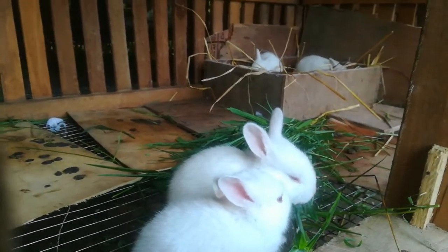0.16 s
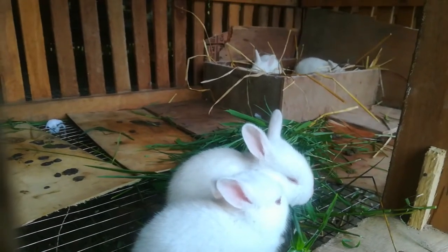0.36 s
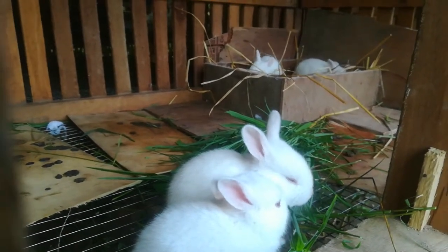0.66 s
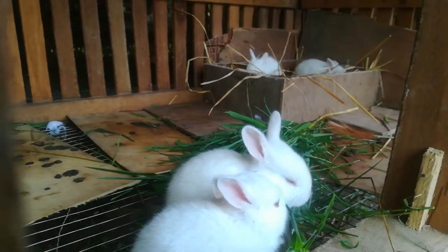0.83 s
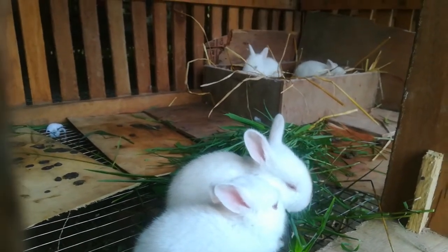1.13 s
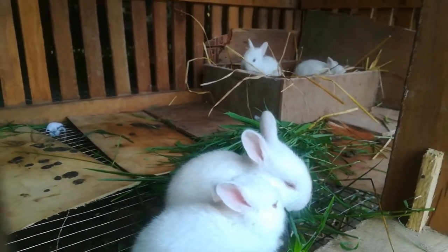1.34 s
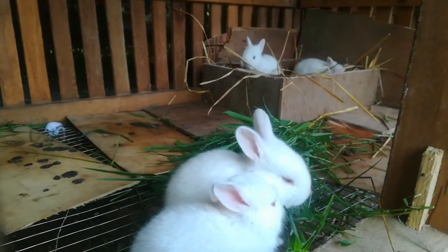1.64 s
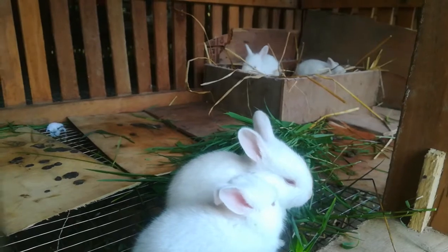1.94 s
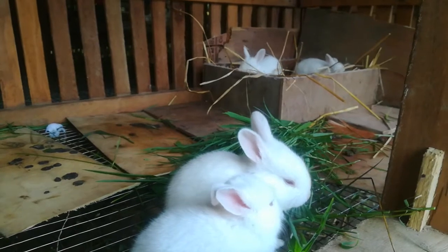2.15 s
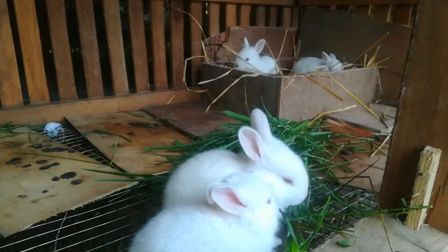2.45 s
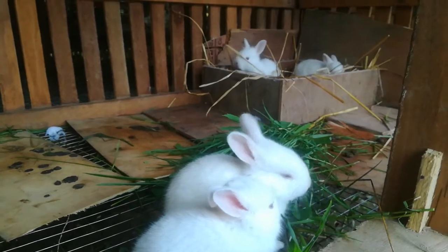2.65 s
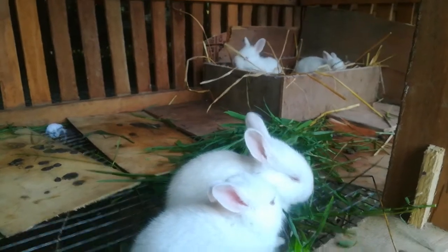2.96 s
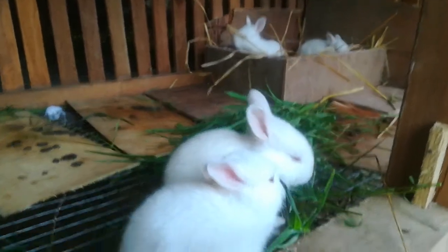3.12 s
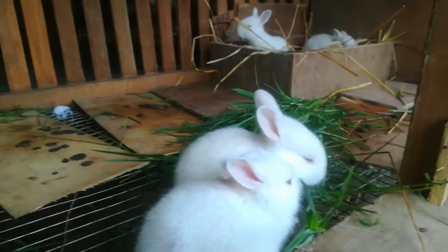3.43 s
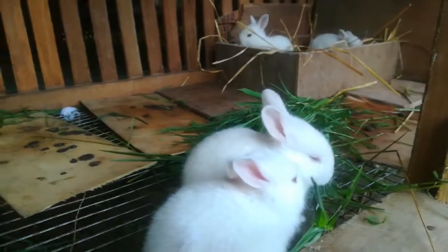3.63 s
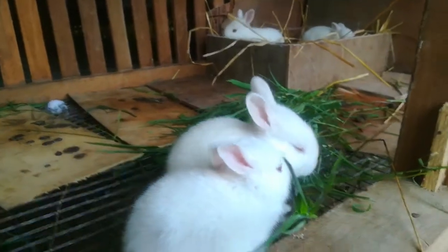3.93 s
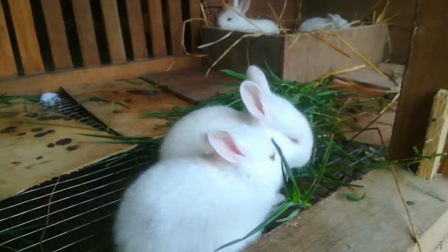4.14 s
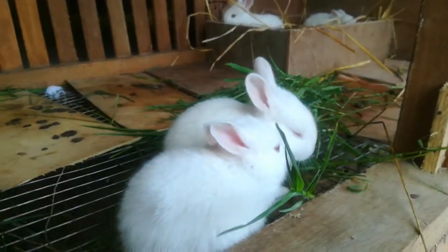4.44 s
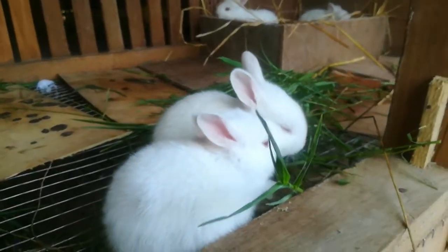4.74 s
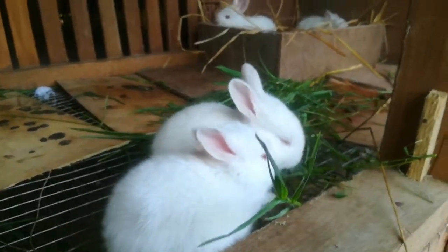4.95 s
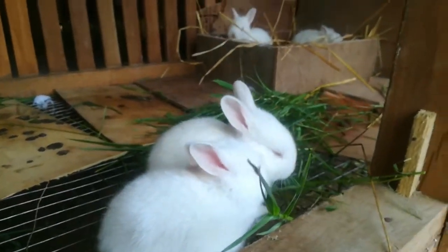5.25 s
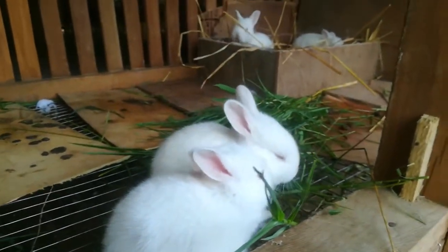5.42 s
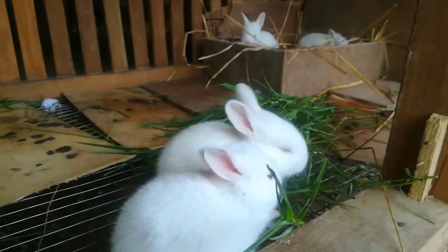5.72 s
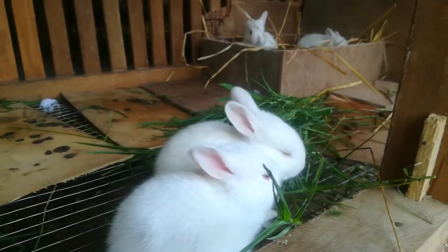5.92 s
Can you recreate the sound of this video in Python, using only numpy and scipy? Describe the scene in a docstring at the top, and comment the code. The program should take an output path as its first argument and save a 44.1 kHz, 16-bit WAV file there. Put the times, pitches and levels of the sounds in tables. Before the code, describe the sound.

Dry grass swishes, small snapping ticks and sudden wooden knocks in a rabbit hutch, over chirping crickets, insect hiss and faint traffic rumble.

```python
"""Rabbits pull at grass in a wooden hutch: dense tiny clicks make the swishes, short ticks the snapping stalks.
Gliding bands of noise scrape and squeak; four knocks ring the boards, shake straw and rattle the wire floor.
On this warm evening a near cricket chirps in threes and a far one calls in single syllables, both made from
clicking teeth on a wing; a chorus of band-limited noise hisses, and noise with a swelling bass is far traffic."""
import sys
import numpy as np
from scipy import signal
from scipy.io import wavfile

SR = 44100
rng = np.random.default_rng(int(sys.argv[2]) if len(sys.argv) > 2 else 0)


def dump_mix(stems):
    """Bounce the given channels to the path in sys.argv[1] as a 16-bit WAV at rate SR."""
    frames = np.atleast_2d(stems).T  # one column per channel
    limited = np.clip(frames, -1, 1)  # hard clip at full scale
    pcm = np.round(limited * 32767).astype(np.int16)
    wavfile.write(sys.argv[1], SR, pcm)


N = 268128
TIME = np.arange(N) / SR
EDGES = 24 * 2 ** np.arange(0, 9.7, .4)   # borders of the noise bands, Hz
CENTRES = np.sqrt(EDGES[1:] * EDGES[:-1])

# Knocks shaking straw and wire. Each row: start in seconds, clatter level in dB, rise of the clatter in seconds,
# level of the wire mesh in dB.
KNOCKS = [(0.148, -16, 0.012, -31.5), (2.333, -18, 0.013, -39), (3.404, -22, 0.019, -72),
          (5.986, -24, 0.0031, -56)]


def from_db(db):
    """Turn dB into gain."""
    return 10 ** (np.asarray(db) / 20)


def rms_one(x):
    """Scale to an rms (average strength) of 1."""
    return x / np.sqrt(np.mean(x ** 2) + 1e-20)


def at_hz(points, hz):
    """Read a curve of (Hz, value) points, spacing the pitches by octaves."""
    pitches, values = np.transpose(points)
    return np.interp(np.log(hz), np.log(pitches), values)


def drift(rate_hz):
    """Slow random wandering of rms 1: smoothed noise, made at every 40th sample and joined by lines."""
    r = np.exp(-80 * np.pi * rate_hz / SR)
    noise = rng.standard_normal(N // 40 + 2002)
    slow = signal.lfilter([1], [1, -2 * r, r * r], noise)[2000:]   # skip the filter's start
    return np.interp(np.arange(N) / 40, np.arange(len(slow)), rms_one(slow))


def gate(start, end, edge):
    """Fade smoothly on around the start and off around the end."""
    inside = np.minimum(TIME - start, end - TIME)
    return np.sin(np.pi / 2 * np.clip(inside / max(edge, .001) + .5, 0, 1)) ** 2


def ring(x, hz, t60):
    """A resonance: a unit click sets off a sine that fades by 60 dB in t60 seconds."""
    r = from_db(-60 / (t60 * SR))
    w = 2 * np.pi * hz / SR
    return signal.lfilter([0, np.sin(w)], [1, -2 * r * np.cos(w), r * r], x + 1e-18)


def low_or_high(x, hz, kind, order=2):
    """Keep only what lies below ("low") or above ("high") a pitch."""
    return signal.sosfilt(signal.butter(order, hz, kind, fs=SR, output="sos"), x)


def band(x, low, high, order=2):
    """Keep only the pitches between low and high."""
    return low_or_high(x, [low, min(high, .45 * SR)], "band", order)


def diffuse_bands(source):
    """Split a noisy source into stereo bands, as two spaced microphones hear sound from all round."""
    # How alike the two sides are. Each row: pitch in Hz, likeness from -1 to 1.
    likeness = [(60, .98), (130, .92), (290, .6), (640, -.1), (1410, .05), (3100, 0)]
    # Balance of the sides. Each row: pitch in Hz, left minus right in dB.
    balance = [(500, 0), (1300, 0.5), (2400, -3.5), (4400, -0.5), (8000, 0), (15000, -1)]
    for k, hz in enumerate(CENTRES):
        mid, side = band(source[k % 2], EDGES[k], EDGES[k + 1])   # neighbouring bands use unrelated streams
        alike = np.clip(at_hz(likeness, hz), -1, 1)
        lean = from_db(at_hz(balance, hz) / 2)
        stereo = np.sqrt(1 + alike) * mid + np.sqrt(1 - alike) * side * [[1], [-1]]
        yield hz, stereo * [[lean], [1 / lean]] / np.sqrt(2)


def grains(per_s, spread_db):
    """Dense clicks of uneven size and random sign, in four unrelated streams."""
    shape = (2, 2, N)
    sizes = from_db(spread_db * np.minimum(rng.exponential(1, shape), 5))
    sizes = sizes * rng.choice([-1, 1], shape)
    return rms_one(sizes * (rng.random(shape) < per_s / SR))


def placed(x, pan_db, lag_s):
    """A point source reaches the left microphone a little later."""
    left = np.interp(TIME - lag_s, TIME, x) * from_db(pan_db / 2)
    return np.array([left, x * from_db(-pan_db / 2)])


def stroke(s, hold, rise, fall):
    """Power that climbs evenly in dB, holds at 1 and sinks evenly again."""
    edge_db = 30   # change over one rise or fall time; each runs on for two such times
    out = np.zeros(N)
    span = slice(max(round((s - 2 * rise) * SR), 0), max(round((s + hold + 2 * fall) * SR), 0))
    climb = (TIME[span] - s) / max(rise, .001)
    sink = (s + hold - TIME[span]) / max(fall, .001)
    out[span] = from_db(2 * edge_db * np.minimum(np.minimum(climb, sink), 0))
    return out


def air():
    """Far traffic and leaves as noise: the bass swells and every band flickers a little."""
    # Colour of the noise. Each row: pitch in Hz, relative level in dB per Hz.
    colour = [(20, 2), (60, 0.5), (104, 1.5), (180, -9.5), (293, -13), (400, -21), (1180, -21.5),
              (2660, -22.5), (4500, -25), (6000, -17.5), (8100, -34.5), (11400, -25), (15900, -27.5)]
    # Swell of the bass. Each row: time in seconds, level in dB.
    rumble = [(0, -0.5), (1, -1.5), (3, -2), (3.9, -2.5), (4.0, 1.5), (4.5, -2.5), (5.2, -.6), (5.4, -4),
              (6.08, 2)]
    level_db = -65.5
    swell = np.interp(TIME, *np.transpose(rumble))
    out = 0
    for hz, noise in diffuse_bands(rng.standard_normal((2, 2, N))):
        bass_share = np.clip(np.log2(300 / hz), 0, 1)   # full below 150 Hz, none above 300 Hz
        out = out + noise * from_db(at_hz(colour, hz) + swell * bass_share + 3.02 * drift(15.8))
    return from_db(level_db) * rms_one(out)


def chorus():
    """Many insects blur into steady bands of hiss whose strength throbs a little."""
    # Bands of singers. Each row: lowest pitch in Hz, highest pitch in Hz, level in dB.
    singers = [(6300, 7640, -64), (7280, 7620, -68), (8450, 10650, -68.5), (9050, 10150, -63.5)]
    out = 0
    for low, high, db in singers:
        throb = from_db(1.0 * drift(1.9) + 0.65 * drift(60))
        out = out + from_db(db) * throb * rms_one(band(rng.standard_normal((2, N)), low, high, order=5))
    return out


def stridulation(hz, width_hz):
    """Teeth of the file click unevenly within each wing stroke and ring the wing; foliage smears them."""
    strokes_per_s, stroke_depth, teeth_per_s = 79, .28, 280   # both rates wander
    turns = np.cumsum(strokes_per_s * (1 + 0.0522 * drift(11.4))) / SR
    strokes = 1 + stroke_depth * np.cos(2 * np.pi * turns)
    teeth_passed = np.cumsum(teeth_per_s * (1 + 0.16 * drift(60))) / SR
    teeth = np.diff(np.floor(teeth_passed), prepend=0)   # 1 at each tooth, else 0
    clicks = teeth * from_db(1.5 * rng.standard_normal(N)) * rng.choice([-1, 1], (2, N))
    drive = clicks + .14 * rng.standard_normal((2, N))
    return rms_one(band(drive * strokes, hz - width_hz / 2, hz + width_hz / 2, order=3))


def syllables(rows):
    """Strength of a cricket whose syllables all swell and break off alike."""
    rise_s, fall_s = 0.076, 0.089
    return np.sqrt(sum(from_db(2 * db) * stroke(s, hold, rise_s, fall_s) for s, hold, db in rows))


def far_cricket():
    """A faint cricket rubs its wings in single syllables."""
    # Each row: time at full strength in seconds, level in dB.
    calls = [(1.95, -71), (2.08, -70), (2.2, -77), (2.29, -71), (3.25, -76), (3.62, -72), (3.7, -76),
             (3.89, -77), (4.42, -74), (4.55, -72), (4.68, -68), (4.81, -69.5), (4.95, -70), (5.11, -79),
             (5.71, -73), (5.86, -72)]
    hold_s = 0.044
    return syllables([(s, hold_s, db) for s, db in calls]) * stridulation(hz=5050, width_hz=400)


def near_cricket():
    """A nearer cricket rubs its wings in chirps of three syllables, about one chirp every 1.2 s."""
    # Each row: start of full strength in seconds, hold in seconds, level in dB.
    chirps = [(.39, 0.08, -57), (.545, 0.068, -56.5), (.69, 0.063, -59), (1.55, .075, -54.5),
              (1.685, .09, -53.5), (1.835, 0.074, -52), (2.835, 0.054, -55.5), (2.96, 0.072, -55.5),
              (3.11, 0.076, -60), (4.01, 0.078, -56), (4.135, 0.081, -53.5), (4.285, 0.081, -53.5),
              (5.25, .06, -56.5), (5.36, 0.093, -56), (5.5, 0.09, -56)]
    return syllables(chirps) * stridulation(hz=5470, width_hz=430)


def boards():
    """Each contact is a half-sine push, duller when longer; it rings the board and the hollow hutch."""
    # Contacts on the wood. Each row: start in seconds, board ring in dB, hollow thud in dB, contact in ms.
    blows = [(.150, -41, -63, 0.54), (.165, -36, -38, 0.52), (.203, -50, -50, 4.0), (.222, -60, -58, 5.7),
             (.296, -63.5, -48, 5.2), (.39, -70, -37, 7.8), (.452, -63, -39.5, 7.6), (2.336, -59, -40, 1.1),
             (2.39, -65, -45, 2.3), (2.46, -70, -46, 4.9), (3.4062, -27, -70, 0.9), (3.409, -27, -59, 0.5),
             (3.413, -50, -52, 0.5), (3.4245, -28.5, -76, 0.43), (3.479, -48, -65, 0.58),
             (3.437, -41, -65, 0.35), (5.972, -60, -36.5, 1.2), (5.983, -21, -34.5, 1.8),
             (5.9865, -24, -24.5, 0.096), (5.992, -27, -21.5, 2.7), (6.045, -50, -34, 3.0)]
    # Tones of the board, varied by chance. Each row: pitch in Hz, level in dB, time to fade by 60 dB in seconds.
    board_tones = [(556, -43, 0.075), (686, -8, 0.056), (726, 0.5, 0.046), (900, -9, 0.056),
                   (1090, -8.5, 0.18), (2120, -5, 0.021), (2900, -9, 0.014)]
    # Tones of the hollow hutch. Each row: pitch in Hz, level in dB, time to fade by 60 dB in seconds.
    hutch_tones = [(62, -12, 0.23), (105, -6.5, 0.2), (167.6, 2, 0.072)]
    board, hollow = np.zeros(N), np.zeros(N)
    chance_db = rng.normal(0, 1.1, (len(blows), len(board_tones)))
    for (s, ring_db, thud_db, contact_ms), uneven in zip(blows, chance_db):
        at = round(s * SR)
        size = max(round(contact_ms * SR / 1000), 1)
        push = np.zeros(min(N - at, SR // 2))
        push[:size] = np.sin(np.pi * (np.arange(size) + .5) / size) * np.pi / 2 / size
        span = slice(at, at + len(push))
        for (hz, db, t60), extra_db in zip(board_tones, uneven):
            board[span] += from_db(ring_db + db + extra_db) * ring(push, hz, t60)
        for hz, db, t60 in hutch_tones:
            hollow[span] += from_db(thud_db + db) * ring(push, hz, t60)
    board = low_or_high(board, 500, "high", order=6)   # a narrow board radiates no bass
    hollow = low_or_high(hollow, 50, "high")
    return placed(board, pan_db=-1.2, lag_s=0.00035) + placed(hollow, pan_db=-0.34, lag_s=0.00042)


def wire():
    """Each knock rattles the mesh briefly; its tones reach the two microphones by unrelated paths."""
    # Tones of the mesh floor. Each row: pitch in Hz, level in dB, undamped time to fade by 60 dB in seconds.
    mesh_tones = [(2124, -11, 0.49), (2450, -10, 0.32), (3830, -17, 0.21), (4270, -26, 0.22),
                  (4800, -3.5, 0.2), (4990, 8, 0.2), (5320, 1, 0.15), (6020, -12, 0.15), (6320, -1, 0.21),
                  (6770, -1.5, 0.29)]
    damping = .5   # straw on the mesh shortens its ring to this share
    out, size = np.zeros((2, N)), SR // 2
    age = np.arange(size) / SR
    for s, _, _, wire_db in KNOCKS:
        rattle = rng.standard_normal((2, size)) * np.exp(-age / 0.025) * .05
        rung = sum(from_db(wire_db + db) * ring(rattle, hz, damping * t60) for hz, db, t60 in mesh_tones)
        at = round(s * SR)
        out[:, at:at + size] += rung[:, :N - at]
    return out


def clatter_power(hz):
    """Each knock shakes wire and straw into a clatter that dies band by band: its power near one pitch."""
    # Colour of each knock's clatter, one list a knock. Each row: pitch in Hz, level in dB per Hz.
    clatter_colours = [
        [(35, -43), (60, -0.5), (105, 6.5), (231, -6), (351, 5), (464, -16), (642, 8.5), (705, 2), (1150, 2),
         (1960, 4.5), (4850, 7.5), (15500, -21)],
        [(35, -41), (60, -6), (171, -9), (226, -2.5), (359, 1), (464, -12), (673, 1), (810, -2), (1290, -2),
         (3190, 5.5), (5320, 3), (15500, -28.5)],
        [(35, -50), (60, -38), (139, -9.5), (272, -22), (705, 8), (849, -18), (1070, 10), (1350, -1.5),
         (1550, -10), (1700, 1.5), (4630, -1.5), (15500, -40)],
        [(35, -32), (60, 26.5), (129, -13), (231, -2), (376, 7.5), (533, -28), (792, 15.5), (910, -18),
         (976, 4), (1350, -3), (5450, -15), (15500, -45)],
    ]
    # Dying away. Each row: pitch in Hz, time to fade by 60 dB in seconds.
    fade_times = [(80, 0.5), (200, 0.5), (500, 0.25), (1500, 0.25), (4000, 0.24), (8000, 0.24),
                  (15000, 0.23)]
    echo_db, echo_stretch = -21, 2.44   # the shed answers more faintly and for longer
    power = np.zeros(N)
    for (s, db, rise, _), colour in zip(KNOCKS, clatter_colours):
        at = round(s * SR)
        age = TIME[at:at + SR] - TIME[at]
        swell = 1 - np.exp(-age / (rise + 2.1 / hz))   # lows build up more slowly
        fall_db = -60 * age / at_hz(fade_times, hz)
        fading = from_db(fall_db) ** 2 + from_db(echo_db + fall_db / echo_stretch) ** 2
        power[at:at + SR] += (swell * from_db(db + at_hz(colour, hz))) ** 2 * fading
    return power


def scrapes():
    """Narrow scrapes, squeaks and faint far calls: slow noise carried on a gliding pitch."""
    # Each row: start in seconds, end in seconds, first pitch in Hz, last pitch in Hz, width in Hz, level in dB.
    glides = [(.97, 1.05, 4600, 4600, 200, -83), (1.08, 1.16, 4700, 4800, 200, -73),
              (1.189, 1.28, 4720, 4720, 200, -77), (1.3, 1.38, 4700, 4600, 200, -84),
              (1.143, 1.23, 3470, 3480, 220, -68.5), (1.191, 1.271, 2950, 2100, 600, -72.5),
              (2.5, 2.593, 3900, 3300, 800, -68), (2.541, 2.573, 3100, 2420, 800, -63),
              (2.569, 2.656, 2430, 2330, 600, -67), (2.932, 3.003, 680, 710, 200, -69.5),
              (2.929, 3.007, 1153, 1150, 400, -71), (3.297, 3.36, 3420, 3440, 200, -74),
              (3.708, 3.76, 2990, 2980, 400, -72), (3.754, 3.855, 2500, 1990, 200, -79),
              (3.973, 4.09, 3480, 3490, 300, -70), (3.991, 4.122, 1750, 1800, 300, -66),
              (3.99, 4.1, 4300, 4300, 250, -72), (4.028, 4.116, 2200, 2100, 300, -66),
              (4.06, 4.12, 15000, 15000, 1000, -72), (4.164, 4.283, 1423, 1245, 300, -77),
              (4.898, 4.992, 3700, 3540, 200, -66), (5.19, 5.28, 1166, 1147, 70, -66.5),
              (5.204, 5.326, 3620, 3670, 200, -75.5), (5.252, 5.349, 900, 1195, 251, -68.5),
              (5.424, 5.533, 2730, 2600, 250, -62.5), (5.437, 5.642, 1512, 1423, 199, -66),
              (5.46, 5.54, 1950, 2150, 250, -62.5), (5.464, 5.58, 1700, 1760, 250, -65.5),
              (5.54, 5.635, 2240, 2176, 302, -63), (5.641, 5.745, 2243, 2215, 220, -62.5),
              (5.73, 5.84, 2170, 1890, 200, -68), (5.88, 5.963, 2150, 2050, 120, -71),
              (5.878, 5.974, 1113, 1080, 80, -70)]
    stutter = from_db(1.8 * drift(20))   # the rubbing catches and slips
    out = np.zeros((2, N))
    for start, end, from_hz, to_hz, width_hz, db in glides:
        a, b = max(round((start - .05) * SR), 0), min(round((end + 0.021) * SR), N)
        noise = rng.standard_normal((2, 2, 8192 * 3))[:, :, :b - a]
        cos, sin = low_or_high(noise, width_hz / 2, "low")
        pitch = np.interp(TIME[a:b], [start, end], [from_hz, to_hz])
        turn = 2 * np.pi * np.cumsum(pitch) / SR
        glide = rms_one(cos * np.cos(turn) + sin * np.sin(turn))
        strength = gate(start, end, edge=0.045)[a:b] * stutter[a:b]
        out[:, a:b] += glide * strength * from_db(db + np.array([[-2], [2]]))   # stronger on the right
    return out


def snaps():
    """A snapping stalk gives a broad tick with a short ring and a faint scatter from the slats."""
    # Each row: start in seconds, level in dB, pitch in Hz, left minus right in dB, ring level in dB.
    stalks = [(1.5028, -44, 2500, -7, 0), (1.5302, -31, 4500, 3, -7), (2.012, -64, 3460, -6, -1),
              (2.1017, -64, 4680, 3, -5), (2.1785, -61, 2700, -2.5, -2), (2.29, -58, 3490, -2.5, 0),
              (2.692, -45, 3460, -7, -4), (2.7054, -46, 4370, -8, -4), (2.7189, -32.5, 5000, -4, -10.5),
              (2.932, -57.5, 3430, -4.0, -3.5), (3.1136, -57.5, 3530, -4, -4), (3.1595, -60, 3570, -1.5, 0),
              (3.2444, -59, 3670, -0.5, -1), (3.7023, -61, 2900, -7, -10), (3.7095, -52.5, 3030, -17, 1.5),
              (3.8895, -58, 4540, -1.0, -6), (4.0844, -46, 4160, -8, -0.5), (4.118, -61.5, 1750, 11, -3),
              (4.2324, -57.5, 4160, -15, -1), (4.9442, -56, 3740, -6.5, -1),
              (5.0107, -46.5, 3700, -12, -8.5), (5.2054, -52.5, 3470, -7, -4), (5.4046, -60.5, 2610, 0, -6)]
    out, size = np.zeros((2, N)), 2048
    age = np.arange(size) / SR
    click = (age == 0) * 1.
    tick = band(click, 1550, 4600) * 2.0
    for s, db, hz, pan_db, ring_db in stalks:
        fading_noise = rng.standard_normal((2, size)) * 0.16 * np.exp(-age / .008)
        scatter = band(fading_noise, 1600, 6000)
        one = tick + from_db(ring_db) * ring(click, hz, t60=75.0 / hz) + scatter
        at = round(s * SR)
        out[:, at:at + size] += one * from_db(db + np.array([[pan_db / 2], [-pan_db / 2]]))
    return out


def grass_and_clatter():
    """Stalks dragged or chewed rub as dense grains; the same grains carry the clatter of the knocks."""
    # Swishes. Each row: start of full strength in seconds, hold in seconds, rise in seconds, fall in seconds,
    # level in dB, weight of the lows in dB, weight of the highs in dB.
    swishes = [(.01, 0.1, 0.13, 0.093, -48, -16.5, 0), (0.463, 0.027, 0.091, 0.74, -69, -8, -20),
               (0.741, 0.082, 0.25, 0.11, -53.5, -19, 1), (1.447, .095, 0.19, 0.17, -48.5, -19, -2),
               (1.822, 0.0092, 0.13, 0.086, -68, -12, -8), (2.098, .005, .02, .08, -69.5, 0, -9),
               (2.179, 0.059, 0.023, 0.22, -63.5, -24, -16), (2.653, 0.048, .045, 0.071, -53.5, -28, -7),
               (2.936, 0.06, 0.14, 0.11, -72, 4, -11), (3.173, 0.077, .3, .08, -72, -17, -3),
               (3.45, 0.081, .04, 0.064, -57, -11, -9), (3.701, 0.014, .04, 0.079, -70, -33, 1),
               (4.056, 0.064, 0.25, 0.038, -63.5, -10, -6.5), (4.17, .065, .02, 0.32, -70, -12, -9),
               (4.953, 0.058, .13, 0.16, -64, -22, -14), (5.193, 0.044, 0.2, 0.2, -66.5, -14, -24),
               (5.48, .11, 0.13, 0.24, -60, -18, -24), (5.95, 0.067, .2, 0.13, -63, -5, -8.5),
               (5.993, 0.0023, 0.0092, 0.056, -42, 14, -28), (6.016, 0.054, .03, .1, -49.5, -16, -12)]
    # Colour of the rustling. Each row: pitch in Hz, level in dB per Hz.
    rustle_colour = [(200, 12.5), (500, 1.5), (900, 11.5), (1600, 10.5), (2600, 9), (5000, 13.5),
                     (7500, 7.5), (13000, 5.5), (16000, 5)]
    # the straw is never quite still
    fidget_db, fidget_lows_db, fidget_highs_db, fidget_swing_db = -80, 1.5, -5.5, 3.0
    fidget = from_db(2 * fidget_swing_db * drift(4.5))
    shapes = np.array([stroke(*row[:4]) for row in swishes] + [fidget])
    weights = [row[4:] for row in swishes] + [(fidget_db, fidget_lows_db, fidget_highs_db)]
    level, lows, highs = np.transpose(weights)
    out = 0
    for hz, noise in diffuse_bands(grains(per_s=9000, spread_db=3.0)):
        octaves = np.log2(hz / 2600)
        tilt = lows * np.clip(-octaves / 1.86, 0, 1) + highs * np.clip(octaves / 1.76, 0, 1)
        rustle_power = from_db(level + tilt + at_hz(rustle_colour, hz)) ** 2 @ shapes
        flicker = from_db(0.5 * drift(26.0))
        out = out + noise * np.sqrt(rustle_power + clatter_power(hz)) * flicker
    return out


def scene():
    """Add up all sources."""
    insects = chorus() + far_cricket() + near_cricket()
    hutch = boards() + wire()
    return air() + insects + hutch + scrapes() + snaps() + grass_and_clatter()


def record(dry):
    """Cut the treble steeply above 15750 Hz."""
    return signal.sosfilt(signal.ellip(12, .5, 70, 15750, fs=SR, output="sos"), dry)


dry = scene()
out = record(dry)
dump_mix(out)
```